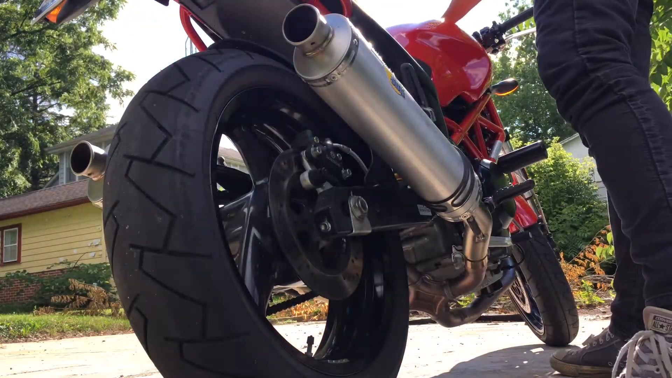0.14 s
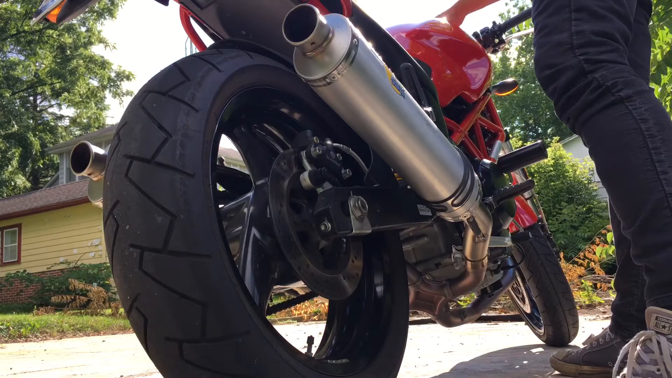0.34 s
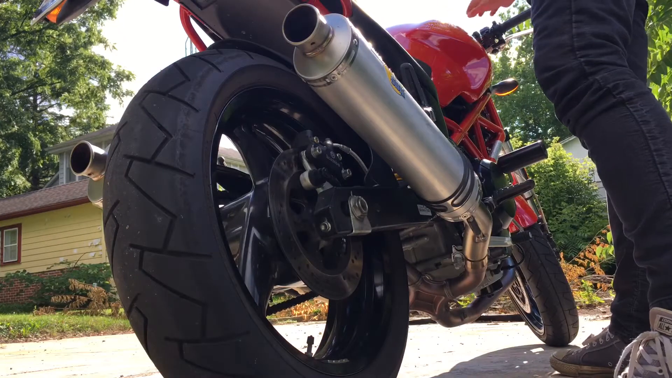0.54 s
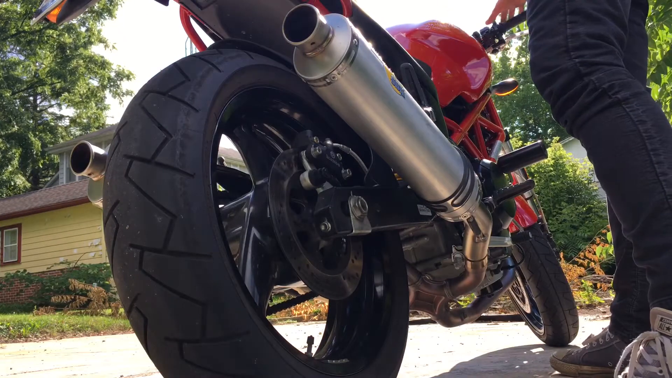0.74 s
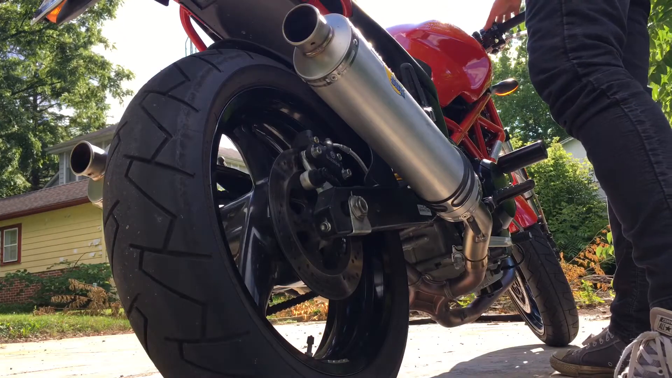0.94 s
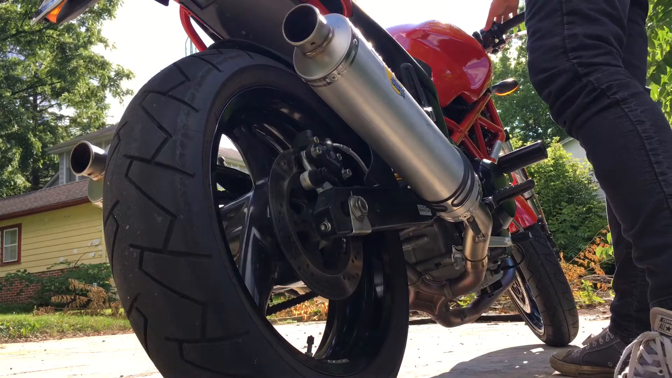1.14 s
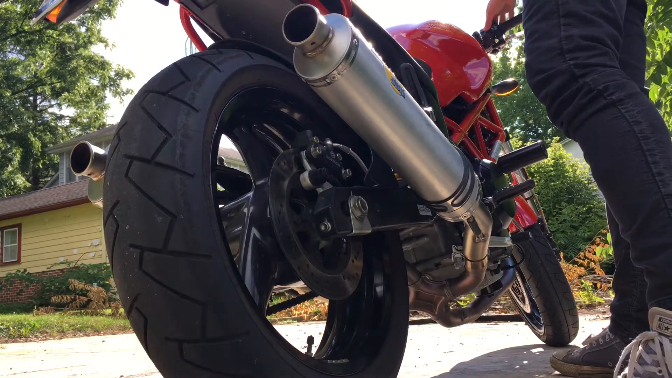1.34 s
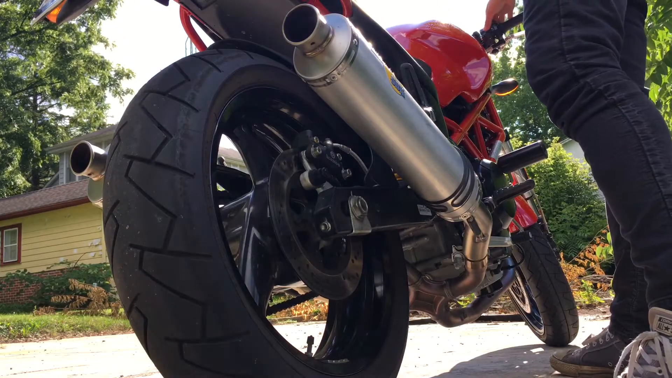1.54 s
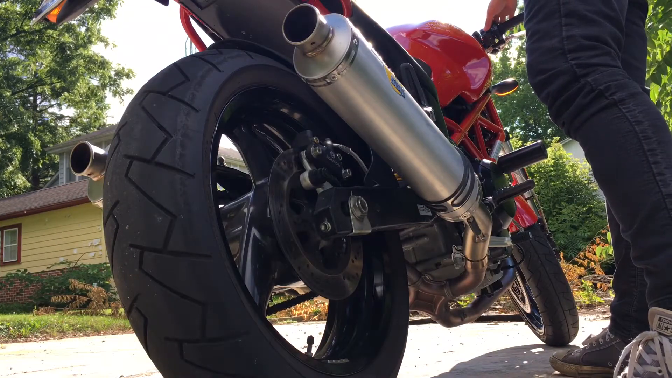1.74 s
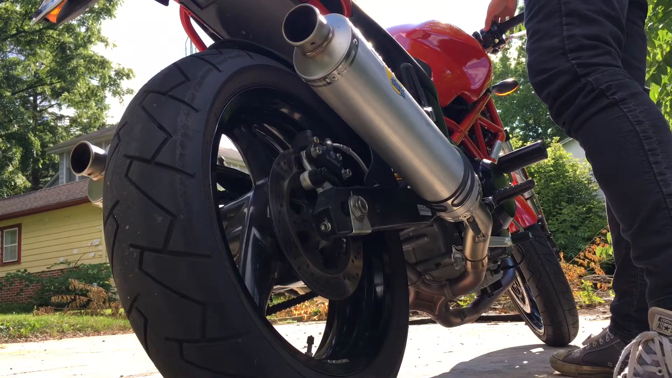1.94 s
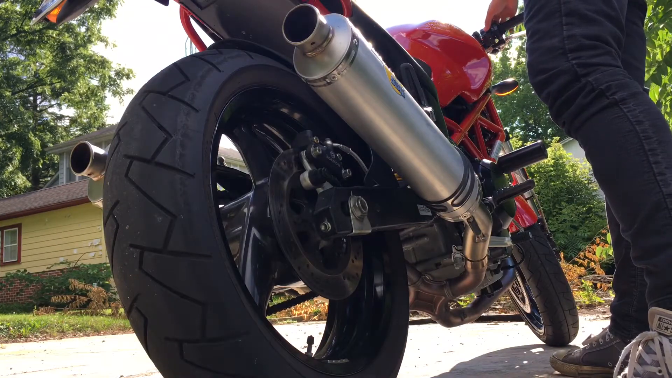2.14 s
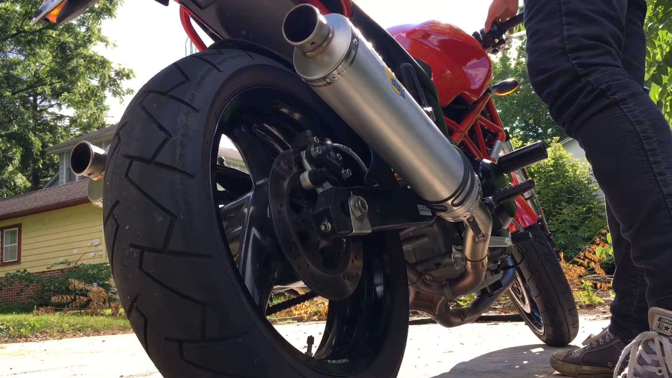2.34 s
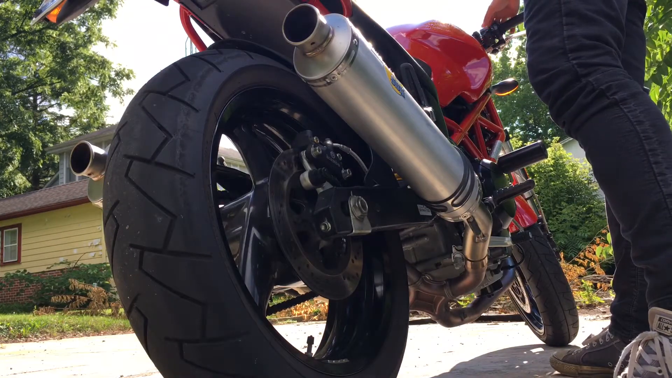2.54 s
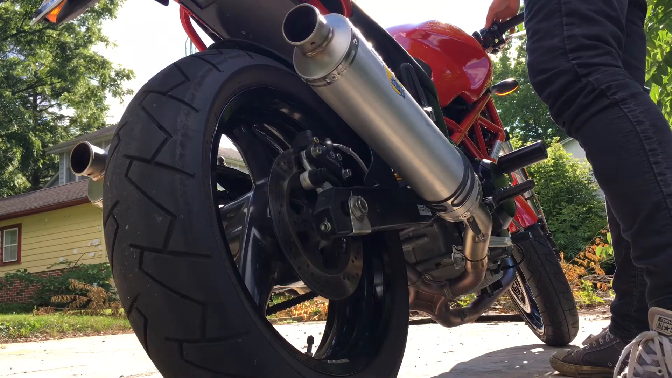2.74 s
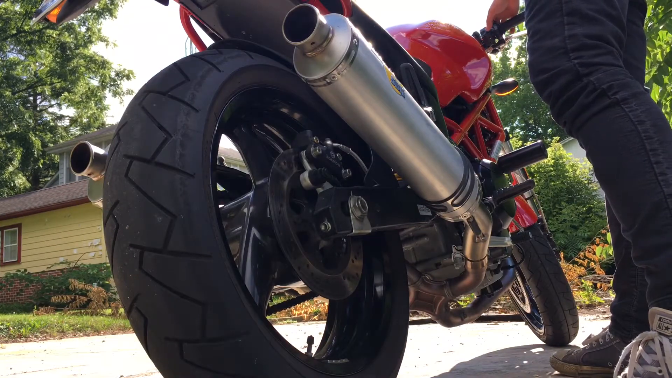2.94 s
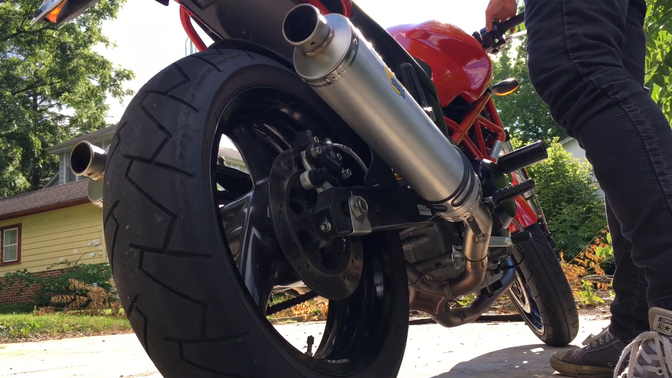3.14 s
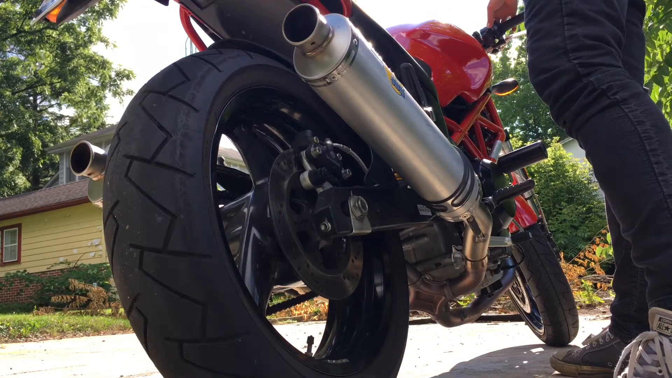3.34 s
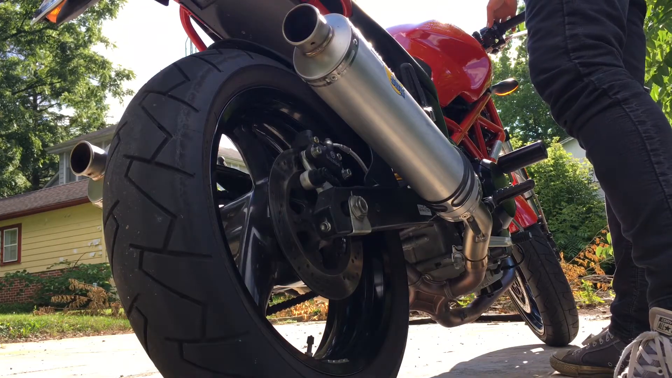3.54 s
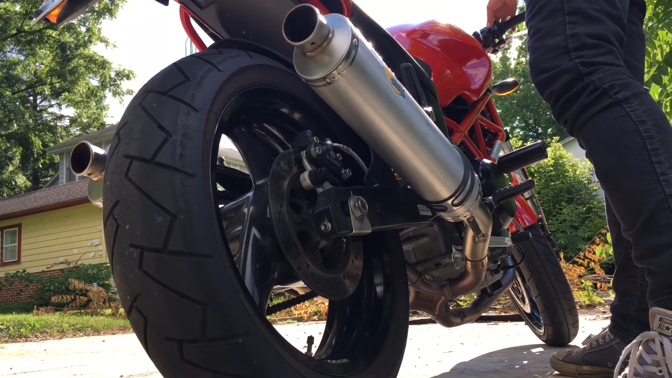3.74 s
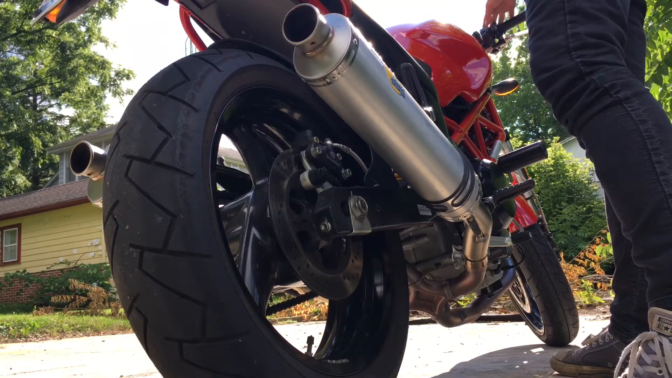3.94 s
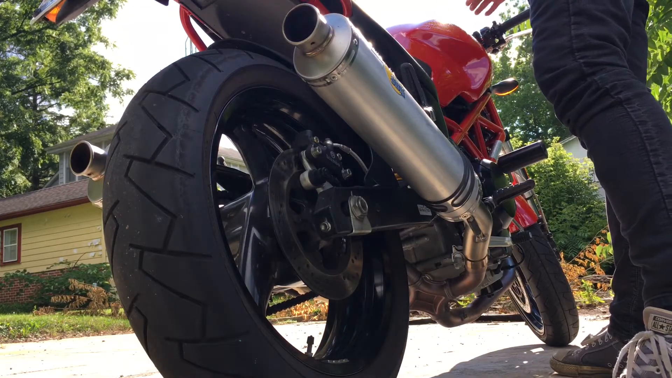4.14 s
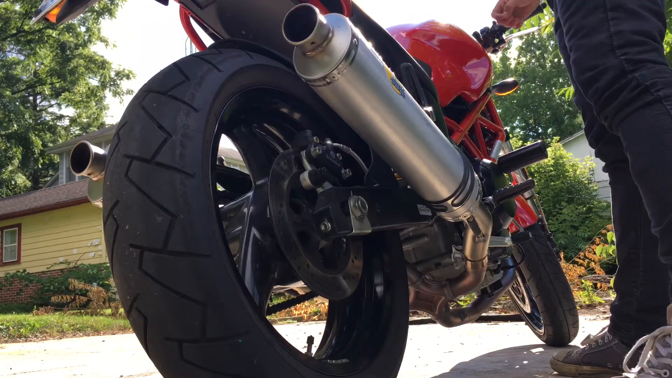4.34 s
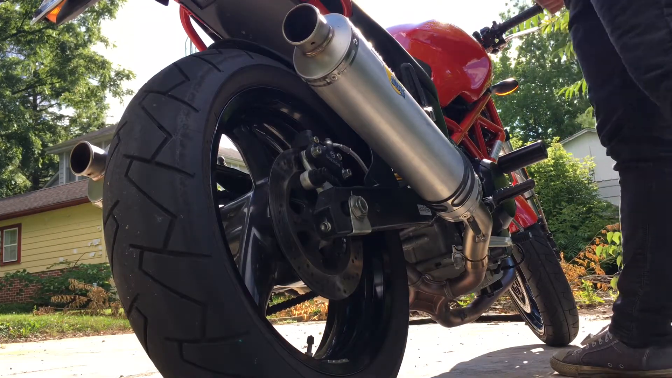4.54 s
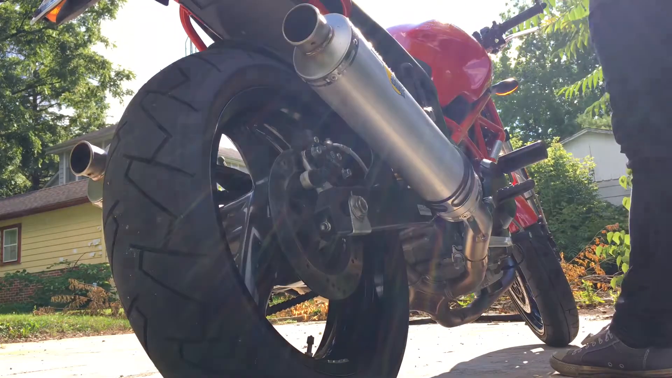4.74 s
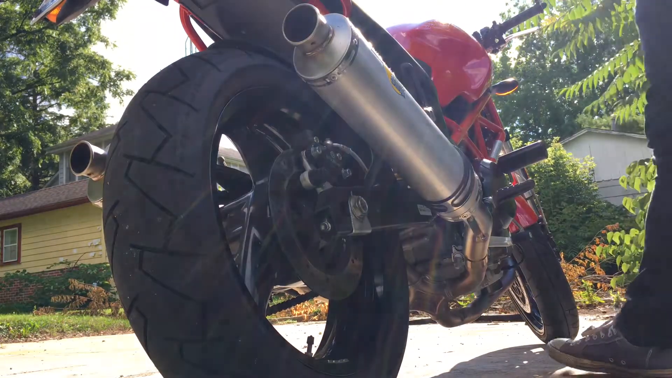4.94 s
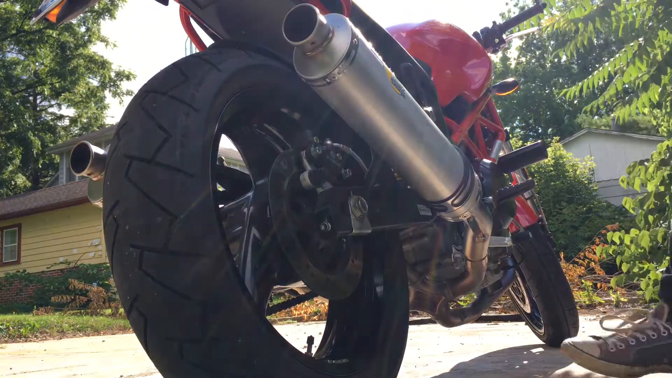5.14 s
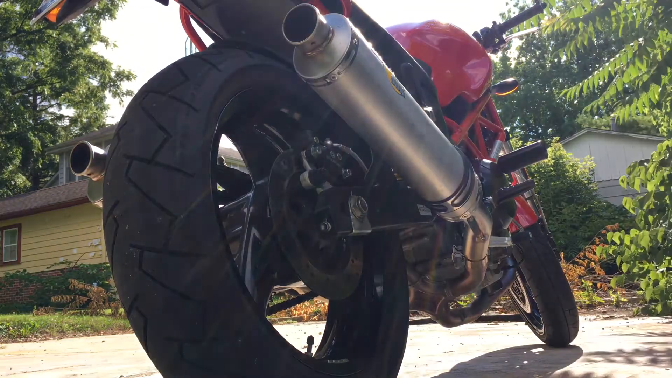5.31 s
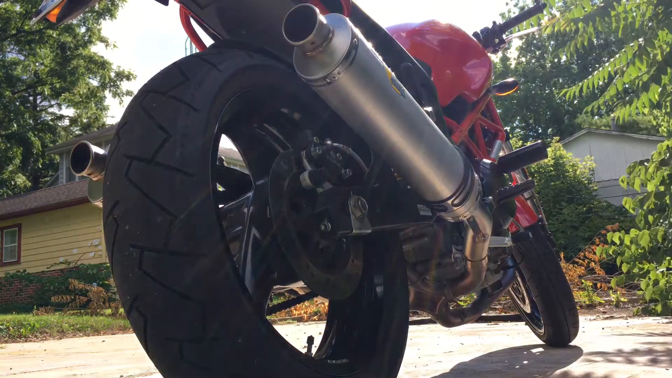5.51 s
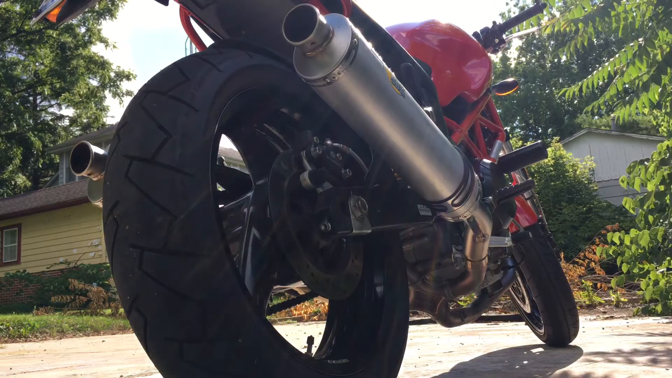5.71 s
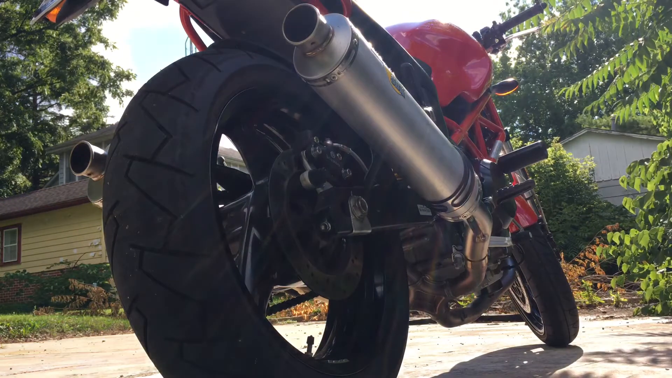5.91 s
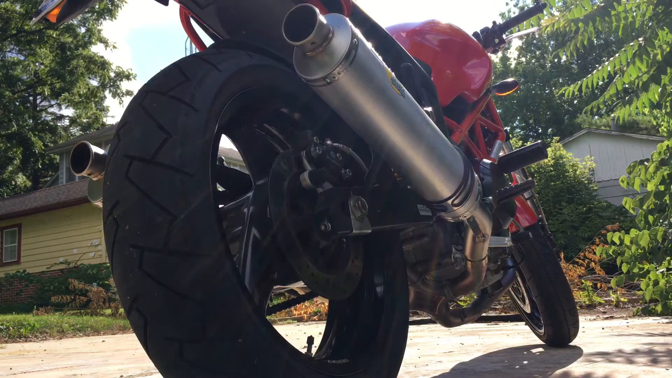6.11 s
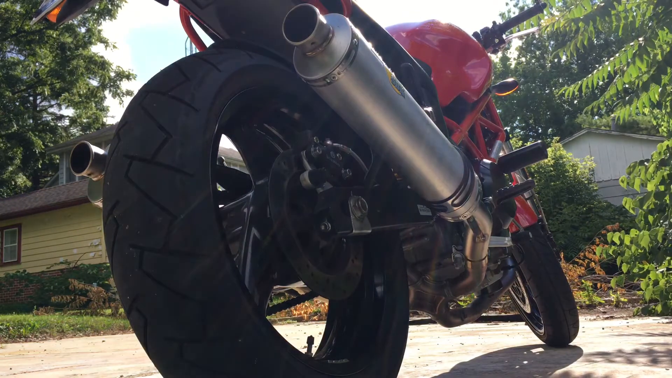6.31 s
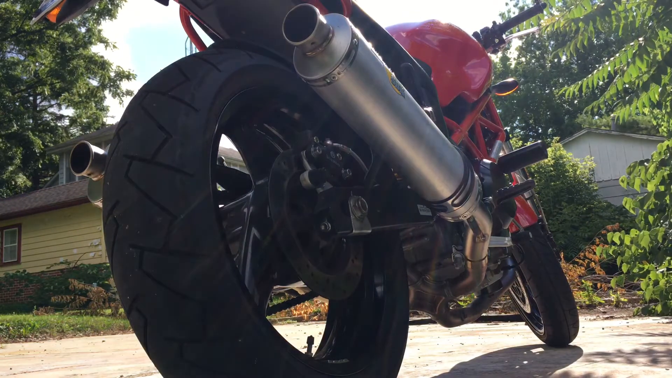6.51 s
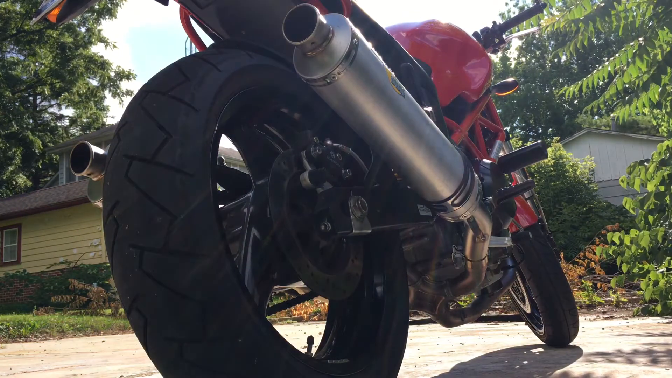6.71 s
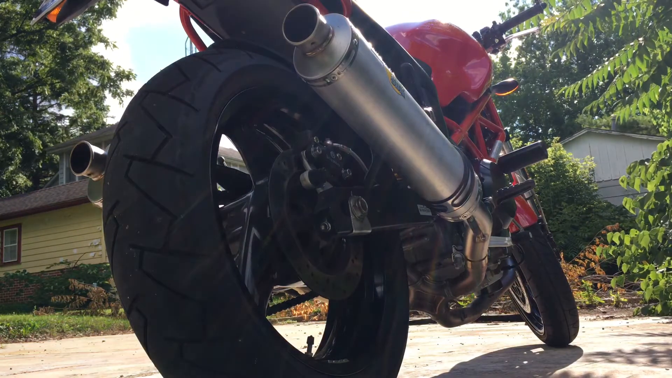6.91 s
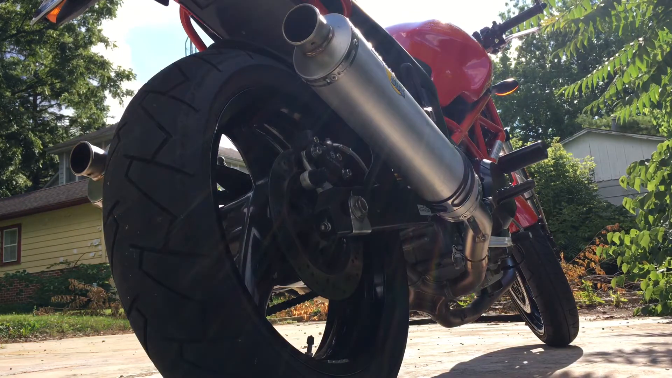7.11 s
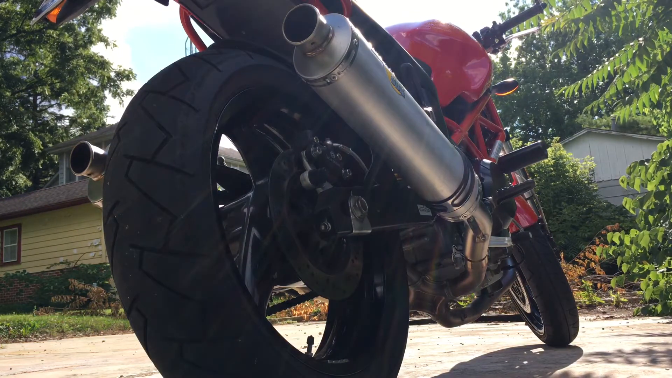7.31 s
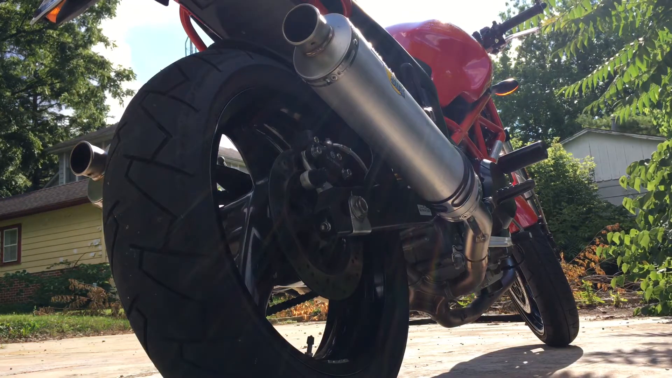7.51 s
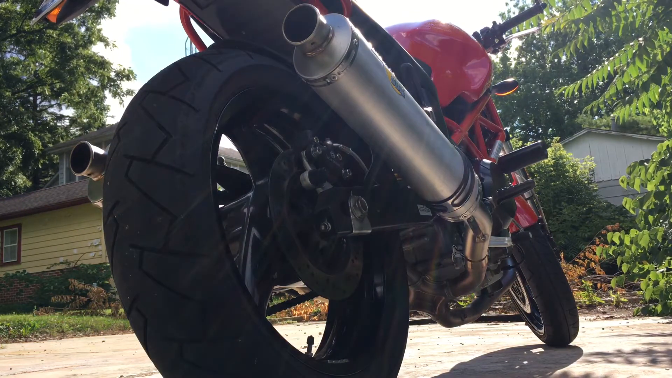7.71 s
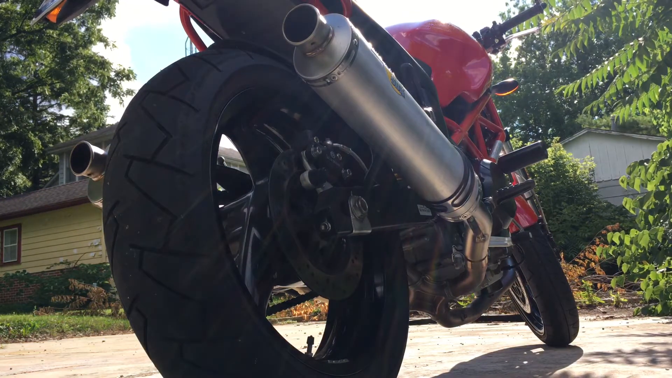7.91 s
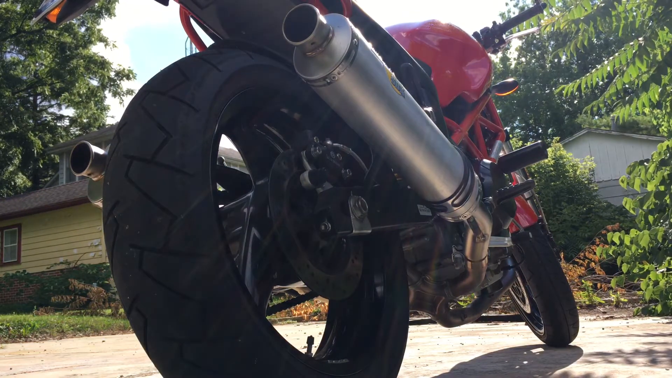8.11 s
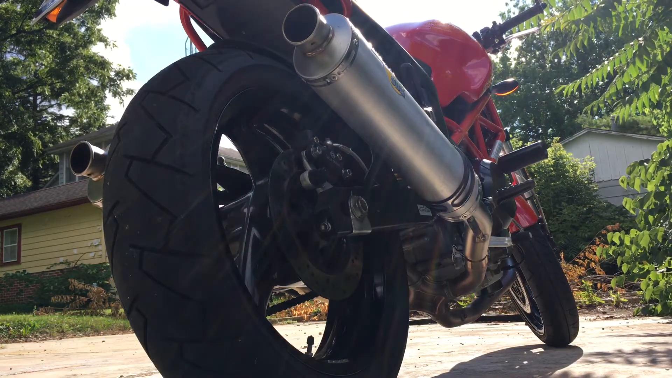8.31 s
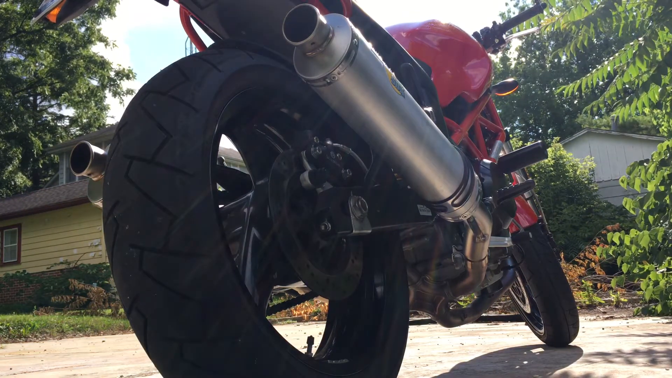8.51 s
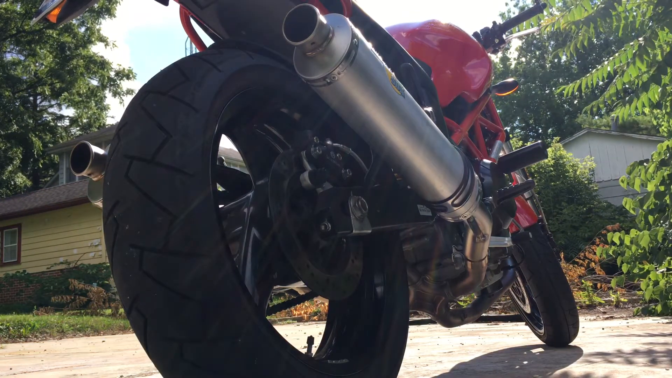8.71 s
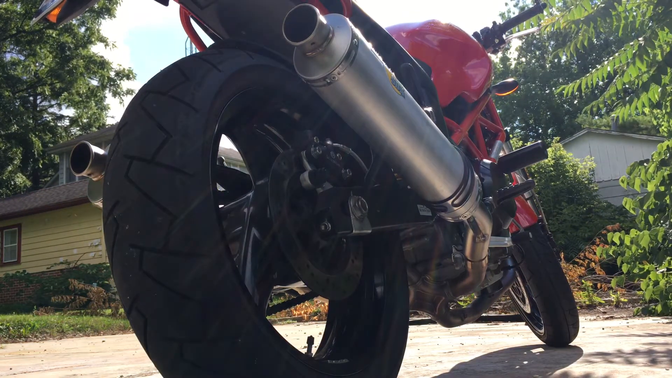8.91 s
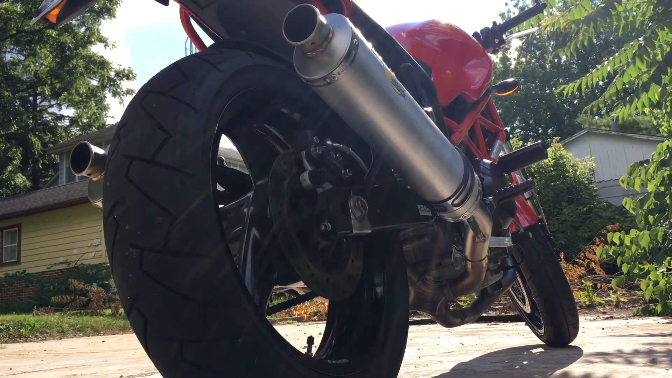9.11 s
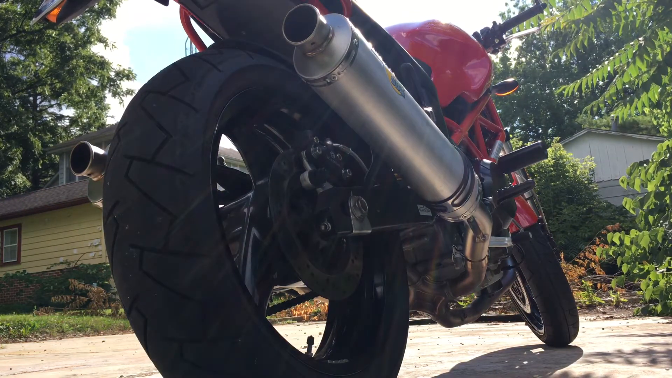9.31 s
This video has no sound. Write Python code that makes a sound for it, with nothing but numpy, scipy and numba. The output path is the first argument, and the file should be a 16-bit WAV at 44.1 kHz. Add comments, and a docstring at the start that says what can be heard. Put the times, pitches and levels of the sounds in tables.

```python
"""A driveway, at ground level behind the two open exhaust pipes of a V-twin motorcycle.
The fuel pump primes over a distant hum, the starter grinds and whines against compression, and the
first firings bark into a limiter. The engine settles into an uneven idle: slugs of gas ring the pipes,
jets hiss at the pipe mouths, valves tick and gears rattle the case."""
import sys
import numpy as np
from scipy import signal
from scipy.fft import rfft, irfft, next_fast_len
from scipy.io import wavfile
from scipy.ndimage import uniform_filter1d, minimum_filter1d
from numba import njit

SR = 44100
rng = np.random.default_rng(int(sys.argv[2]) if len(sys.argv) > 2 else 0)


def to_wav(s):
    """Save 16-bit WAV."""
    ch = np.atleast_2d(s).T  # columns
    pcm = np.round(np.clip(ch, -1, 1) * 32767)  # PCM
    wavfile.write(sys.argv[1], SR, pcm.astype(np.int16))


N = 412776
T = np.arange(N) / SR

# One double thump per engine cycle. Each row: start in seconds, near cylinder in dB,
# far cylinder in dB, hiss of the near blast in dB.
ENGINE_CYCLES = [(3.3004, -5, -25, -50), (3.4328, -2.2, -34, -53), (3.6059, 9, 3.5, -28),
                 (3.6969, 1, -12, -35.5), (3.7931, -8.5, -8.5, -46), (3.906, -13, -26, -55),
                 (4.035, 1.5, -1, -39.5), (4.1422, -0.5, -42, -42), (4.2496, -8.5, -23, -56),
                 (4.3668, 0, -7, -42.5), (4.476, -1.0, -11.5, -42.5), (4.585, -1.8, -12, -43.5),
                 (4.6949, -1, -21, -44), (4.804, -1.7, -10.3, -45), (4.918, -2, -7.5, -44.5),
                 (5.0307, -0.6, -10, -41.5), (5.139, -1.3, -12, -46), (5.2544, -0.5, -9, -43),
                 (5.3624, -0.5, -8, -44), (5.4718, -0.2, -16, -44), (5.5835, -0.2, -10.5, -43),
                 (5.6924, -1.5, -7, -44.5), (5.804, 0, -10, -42), (5.913, -1, -6, -44.5),
                 (6.0255, 0, -11.5, -40), (6.1354, -1, -11, -43), (6.2455, -0.5, -28, -43.5),
                 (6.355, -2.3, -8, -45), (6.466, 0.5, -19, -42.5), (6.5724, -1, -9, -44),
                 (6.6799, -0.5, -29, -43.5), (6.792, -3, -9, -46), (6.9047, 0, -9.5, -42),
                 (7.0097, -2, -5.5, -49), (7.1217, 0, -10.5, -42.5), (7.2296, -1.9, -12.5, -46.5),
                 (7.3461, 0.5, -9.5, -40.5), (7.458, -0.5, -9, -44.5), (7.5718, 0.3, -9.5, -41),
                 (7.681, -1.1, -17, -44.5), (7.7944, -0.9, -9, -42.5), (7.9088, -0.5, -11, -43),
                 (8.0173, -8, -8, -56), (8.1359, 0.5, -5, -41), (8.242, -3.5, -9, -49.5),
                 (8.3536, 0.3, -6, -41), (8.4582, -5.5, -9.5, -50), (8.57, 1, -7, -42.5),
                 (8.6747, -0.8, -8, -45.5), (8.7844, 0, -13, -42.5), (8.893, -4.5, -11.5, -52),
                 (9.0102, 0.5, -9.3, -40.5), (9.1191, -4.5, -5.5, -51), (9.2359, 0, -20, -41.5),
                 (9.344, -5, -30, -51)]


def undb(db):
    """Gain of a level in dB."""
    return 10 ** (np.asarray(db) / 20)


def curve_db(table, column=1):
    """One level column over time, silent before the first row."""
    rows = np.array(table)
    return np.interp(T, rows[:, 0], rows[:, column], left=-120)


def band(f, hz, width_hz):
    """Response of one resonance, gain 1 at its centre."""
    s = 1j * f / hz
    return s * width_hz / hz / (s * s + s * width_hz / hz + 1)


def noise(outline=None, modes=(), outline_db=0.):
    """Noise of rms 1, coloured by a (Hz, dB) outline and (Hz, width Hz, dB) resonances."""
    size = next_fast_len(N)
    f = np.arange(1, size // 2 + 2) * SR / size
    power = np.zeros(len(f))
    if outline:
        hz, db = np.transpose(outline)
        power += undb(2 * (np.interp(np.log(f), np.log(hz), db, left=-99, right=-99) + outline_db))
    for hz, width_hz, db in modes:
        power += undb(2 * db) / (1 + ((f - hz * hz / f) / width_hz) ** 2) ** 2
    y = irfft(rfft(rng.standard_normal(size)) * np.sqrt(power), size)[:N]
    return y / y.std()


def walk(rate_hz):
    """Slewed random steps, spread near 1."""
    hold = int(SR / rate_hz)
    steps = np.repeat(rng.standard_normal(N // hold + 1), hold)
    return 1.27 * uniform_filter1d(steps, hold)[:N]


def add(out, start_s, piece):
    """Mixes a piece into out."""
    i = int(start_s * SR)
    out[i:i + len(piece)] += piece[:max(N - i, 0)]


def bursts(starts, swells, scatter_db):
    """Gate of (delay ms, half-height length ms, dB) swells after each (s, dB) start."""
    gate = np.zeros(N)
    for s, db in starts:
        for delay_ms, length_ms, swell_db in swells:
            gain = undb(db + swell_db + scatter_db * rng.standard_normal())
            hump = np.hanning(int(2 * length_ms * SR / 1000) + 3)
            add(gate, s + (delay_ms - length_ms) / 1000, gain * hump)
    return gate


def glides(rows):
    """Short sliding tones with a flickering level."""
    out = np.zeros(N)
    for s, length_s, from_hz, to_hz, db in rows:
        hz = np.linspace(from_hz, to_hz, int(length_s * SR))
        tone = np.sin(2 * np.pi * np.cumsum(hz) / SR)
        add(out, s, undb(db) * np.hanning(len(hz)) ** .5 * tone)
    return out * undb(2.5 * walk(50))


def firings():
    """Every firing as (s, dB, pipe, pitch ratio); pipe 0 is near, 1 is far."""
    s, near_db, far_db, _ = np.transpose(ENGINE_CYCLES)
    cold_drop, warm_up_s = 0.22, 0.33  # cold gas carries sound slower and rings lower
    tune = 1 - cold_drop * np.exp((s[0] - s) / warm_up_s)
    lag_ms = 38.6 + 0.16 * np.clip(near_db, -10, 3)
    near = zip(s, near_db, [0] * len(s), tune)
    far = zip(s + lag_ms / 1000, far_db, [1] * len(s), tune)
    return [*near, *far]


def exhaust():
    """Each slug of gas rings its pipe behind a steep front; house walls return the upper part."""
    # Each row: frequency in Hz, width in Hz, signed share in the near pipe, same in the far pipe.
    pipe_modes = [(61.3, 6.9, 0.707, 0.552), (112.4, 27.5, 0.711, 0.154), (114.7, 14.5, 0.448, 1.465),
                  (137.3, 56.3, -2.17, -1.918), (138.4, 20.8, 1.498, 0.249), (166.2, 143.7, 1.115, 1.155),
                  (228.8, 120.4, -0.818, -0.694)]
    # Each row: delay in ms, level in dB.
    wall_echoes = [(30.5, -27), (64, -27)]
    size, ring_samples, front_delay_s = 32768, 10000, 0.00245
    f = np.fft.rfftfreq(size, 1 / SR)
    push = band(f, hz=80.7, width_hz=32.4) ** 2
    rings = [irfft(push * sum(mode[2 + pipe] * band(f, *mode[:2]) for mode in pipe_modes))
             for pipe in (0, 1)]
    near_peak = rings[0].max()
    front = irfft(band(f, hz=250.5, width_hz=185) ** 3)[:2000]
    front /= np.abs(front).max()
    out = np.zeros(N)
    for s, db, pipe, tune in firings():
        ring = np.interp(np.arange(ring_samples) * tune, np.arange(size), rings[pipe])
        add(out, s, undb(db) * ring / near_peak)
        front_db = -32.5 + 2 * db + 9.5 * pipe  # steepening grows faster than the pressure
        add(out, s + front_delay_s, undb(front_db) * front)
    wall_response = irfft(band(f, hz=283, width_hz=97) ** 2)[:4096]
    reflected = signal.fftconvolve(out, wall_response)[:N]
    for delay_ms, db in wall_echoes:
        add(out, delay_ms / 1000, undb(db) * reflected)
    return out


def pipe_rumble():
    """Eddies keep the lowest pipe resonances sounding between firings."""
    # Each row: time in seconds, level in dB.
    levels = [(3.25, -39), (3.35, -33), (3.6, -57), (3.65, -34), (3.95, -24.5), (4.3, -26.5), (7.5, -25),
              (9.36, -24)]
    # Each row: frequency in Hz, width in Hz, level in dB.
    low_modes = [(62.4, 32, 5.5), (116.6, 44, 5), (172, 32, -6)]
    return undb(curve_db(levels) + 2.7 * walk(25)) * noise(modes=low_modes)


def whoops():
    """A soft rising whoop follows every firing, louder after a stronger one."""
    delay_s, length_s, from_hz, to_hz = 0.027, 0.034, 170, 320
    rows = []
    for s, db, pipe, _ in firings():
        whoop_db = -35 + 4 * pipe + 0.77 * db + 1.5 * rng.standard_normal()
        rows.append((s + delay_s, length_s, from_hz, to_hz, whoop_db))
    return glides(rows)


def gas_jets():
    """Turbulent hiss at both pipe mouths, one puff per swing of the gas column."""
    # Each row: delay in ms, length in ms, level in dB.
    puffs = [(0, 4.4, 2), (6, 4.66, 1), (12, 6, -5)]
    # Each row: frequency in Hz, density in dB.
    spectrum = [(5000, -1.5), (8000, -5.5), (9600, 1), (12000, 4), (15000, 1), (16500, -14)]
    near = [(s, hiss_db) for s, _, _, hiss_db in ENGINE_CYCLES]
    far = [(s, -39.5 + 2.5 * min(db, 5)) for s, db, pipe, _ in firings() if pipe]
    return bursts(near + far, puffs, scatter_db=2.6) * noise(spectrum)


def shield_snap():
    """The near pipe's pressure wave snaps a loose shield, harder for a fierce blast."""
    # Each row: delay in ms, length in ms, level in dB.
    ticks = [(6.4, 1.6, -0.5), (8.5, 2.2, -9.5), (11.5, 4.4, -14.5)]
    # Each row: frequency in Hz, density in dB.
    spectrum = [(1200, -12), (1800, -5.5), (2800, 3.5), (3600, -8.5), (5000, -12.5), (8000, -13)]
    idle_snap_db, idle_hiss_db, full_rattle_db = -32, -43.5, -23
    starts = [(s, min(idle_snap_db + 1.8 * (hiss_db - idle_hiss_db), full_rattle_db))
              for s, _, _, hiss_db in ENGINE_CYCLES]
    return bursts(starts, ticks, scatter_db=2.2) * noise(spectrum)


def case_clatter():
    """Gears rattle each case panel in its own fits; valves and pistons knock at set crank angles."""
    # Each row: frequency in Hz, width in Hz, level in dB.
    panel_modes = [(632, 162, -1), (1180, 670, -4), (1855, 385, -3), (2754, 97, 1), (3320, 380, -3.5),
                   (4145, 590, -11.5), (6540, 300, -19)]
    # Each row: frequency in Hz, density in dB.
    bed_spectrum = [(150, -46), (250, 0.5), (463, -19.5), (620, -7), (858, -23.5), (1130, -9.5),
                    (1860, -23.5), (2360, -17.5), (3270, -10.5), (4760, -24), (6590, -17.5), (7820, -30),
                    (11400, -36), (15000, -36)]
    # Loudest as the engine catches. Each row: time in seconds, level in dB.
    levels = [(3.58, -57), (3.62, -24.5), (3.72, -37), (3.8, -42.5), (9.36, -42.5)]
    # Each row: position as a share of the cycle, frequency in Hz, width in Hz, length in ms, level in dB.
    knocks = [(0.247, 680, 260, 12.5, -46), (0.239, 1400, 2400, 11.3, -43), (0.95, 2120, 700, 1.4, -48),
              (0.36, 10400, 13000, 7, -52.5), (0.72, 8600, 12000, 6.3, -52.5)]
    panels = np.zeros(N)
    for hz, width_hz, db in panel_modes:
        panel_db = db + 10 * np.log10(width_hz / 1000) + 2.47 * walk(90)
        panels += undb(panel_db) * noise(modes=[(hz, width_hz, 0)])
    envelope = undb(curve_db(levels) + 1.4 * walk(300))
    out = envelope * (undb(-2) * panels + undb(-5) * noise(bed_spectrum))
    starts_s = np.array(ENGINE_CYCLES)[2:, 0]
    periods_s = np.minimum(np.diff(starts_s, append=99), 0.112)
    for share, hz, width_hz, length_ms, db in knocks:
        hits = [(s, db) for s in starts_s + share * periods_s]
        gate = bursts(hits, [(0, length_ms, 0)], scatter_db=0.5)
        out += gate * noise(modes=[(hz, width_hz, 0)])
    return out


def starter_gears():
    """Teeth grind, ring briefly and squeal as a piston climbs to compression; the brushes hiss."""
    # Each row: time in seconds, grind in dB, brush hiss in dB.
    levels = [(3.126, -28.5, -51), (3.25, -31.5, -45), (3.32, -35, -46), (3.4, -34, -44.5),
              (3.53, -37.5, -45.5), (3.6, -27.5, -40.5), (3.72, -59, -49), (3.78, -52, -55.5),
              (4.4, -54.5, -58.5)]
    # Each row: start in seconds, length in seconds, grind in dB, squeal in dB.
    compressions = [(3.152, 0.086, -33.5, -34.5), (3.333, 0.04, -28.5, -28), (3.541, 0.037, -27.5, -27.5)]
    # Each row of both: frequency in Hz, width in Hz, level in dB.
    gear_modes = [(646, 190, -6), (1080, 120, -5), (1356, 300, -7), (2757, 105, 1), (3195, 150, -3.5),
                  (3330, 29, -4), (5710, 430, -21)]
    squeal_modes = [(8500, 70, 2), (9000, 65, 5.5), (9200, 50, -4), (11300, 56, 4), (11300, 100, 3),
                    (11000, 96, 3)]
    # Each row: start in seconds, length in seconds, first and last pitch in Hz, level in dB.
    gear_rings = [(3.142, 0.067, 1280, 1470, -40), (3.18, 0.061, 3330, 3150, -32),
                  (3.367, 0.027, 2785, 2760, -28), (3.545, .04, 2800, 2710, -31.5)]
    end_s, release_s = levels[-1][0], 0.042
    release = np.clip((end_s - T) / release_s, 0, 1)
    grind, squeal = release * undb(curve_db(levels)), np.zeros(N)
    for s, length_s, grind_db, squeal_db in compressions:
        load = np.interp(T - s, [0, .003, length_s, length_s + .015], [0, 0.8, 0.46, 0.005])
        grind += undb(grind_db) * load
        squeal += undb(squeal_db) * load
    grind *= undb(2 * walk(200))
    grind *= noise([(150, 0.5), (1500, 1.5), (4600, -6), (5000, -17), (15000, -19)],
                   gear_modes, outline_db=-11.5)
    squeal *= undb(3.6 * walk(130))
    squeal *= noise([(7800, -4), (9000, 3.5), (12000, -7), (14000, -20)], squeal_modes, outline_db=-11)
    brushes = release * undb(curve_db(levels, column=2))
    brushes *= noise([(5000, -3), (8300, 4.5), (10000, -2), (13000, 1), (15500, -19)])
    return grind + squeal + brushes + glides(gear_rings)


def starter_motor():
    """The motor's whine sags under each compression and climbs again."""
    # Each row: time in seconds, pitch in Hz, level in dB.
    whine = [(3.14, 433.6, -55), (3.18, 423.7, -31), (3.23, 407.5, -32.5), (3.25, 542, -53),
             (3.3, 633, -39), (3.35, 562, -45), (3.385, 579, -41), (3.42, 643, -43), (3.465, 620, -50),
             (3.52, 660, -47), (3.56, 609, -49), (3.62, 645, -41), (3.66, 680, -70)]
    # Each row: multiple of the pitch, level in dB.
    partials = [(1, 0), (2.53, -0.5), (7, -9)]
    s, hz, db = np.transpose(whine)
    pitch_hz = np.interp(T, s, hz) * (1 + 0.0059 * walk(60))
    phase = 2 * np.pi * np.cumsum(pitch_hz) / SR
    tones = sum(undb(tone_db + 3 * walk(40)) * np.sin(k * phase) for k, tone_db in partials)
    return undb(np.interp(T, s, db, left=-120, right=-120)) * tones


def switch_clicks():
    """Switches and a relay give short broad cracks."""
    # Each row: start in seconds, peak in dB, centre in Hz, 60 dB decay time in seconds.
    clicks = [(.002, -28.5, 9000, 0.13), (.004, -33.5, 3600, 0.13), (.081, -36, 11000, .02),
              (0.3892, -43, 3000, 0.0022), (.3887, -27, 443, 0.0042), (.5467, -44, 9000, 0.17),
              (2.054, -38.5, 7000, 0.02), (2.4359, -47, 12000, .015), (3.128, -17, 10100, .03),
              (3.131, -36, 2930, 0.03), (3.544, -29, 2780, 0.036)]
    out, t = np.zeros(N), np.arange(8192) / SR
    f = np.fft.rfftfreq(len(t), 1 / SR)
    for s, db, hz, t60_s in clicks:
        burst = rng.standard_normal(len(t)) * 1000 ** (-t / t60_s)
        crack = irfft(rfft(burst) * band(f, hz, width_hz=0.93 * hz))
        add(out, s, undb(db) * crack / np.abs(crack).max())
    return out


def fuel_pump():
    """The pump primes for two seconds with a high hiss."""
    # Each row: time in seconds, level in dB.
    levels = [(.05, -62), (.12, -61), (.5, -61.5), (.9, -63), (2.04, -67.5), (2.07, -110)]
    # Each row: frequency in Hz, width in Hz, level in dB.
    hiss_modes = [(9640, 1200, 0), (11650, 1100, 6), (12600, 400, -3), (14200, 250, -4)]
    hiss = noise([(7000, 3), (12000, -18), (16500, -8)], hiss_modes, outline_db=-4.5)
    return undb(curve_db(levels) + 1.6 * walk(7.9)) * hiss


def whistles():
    """Two faint thin whistles before the start."""
    # Each row: start in seconds, length in seconds, first and last pitch in Hz, level in dB.
    slides = [(.12, .4, 11450, 12300, -66), (1.3, 0.27, 7550, 7300, -68)]
    return glides(slides)


def yard():
    """A far machine drones under a slowly fading hum; air and rustling leaves lie above."""
    # Each row: multiple of the machine's turning rate, level in dB.
    harmonics = [(3, -18), (4, -0.5), (5, 3), (7, -8), (9, -17), (10, -19), (13, -22), (17, -32)]
    # Each row of both: frequency in Hz, density in dB.
    hum_spectrum = [(15, -65), (25, -27), (48, -12), (58, -7), (82, -1), (210, -21.5), (243, -27),
                    (263, -65), (309, -47), (600, -40.5), (780, -57), (1320, -120)]
    air_spectrum = [(180, -9.5), (300, -10), (509, -20.5), (968, -16), (1140, -17.5), (1350, -19),
                    (2000, -25.5), (16500, -45)]
    # Each row: time in seconds, level in dB.
    leaf_levels = [(0., -58), (.1, -56.5), (2.1, -61), (2.5, -80), (3.1, -66)]
    turning_hz, width_hz, fade_db_per_s = 18.05, 1.97, -0.41
    drone = undb(-30.5) * noise(modes=[(k * turning_hz, width_hz, db) for k, db in harmonics])
    hum = undb(-33.5) * noise(hum_spectrum)
    air = undb(-53.5 + 0.13 * walk(4.6)) * noise(air_spectrum)
    leaves = undb(curve_db(leaf_levels) + 2.3 * walk(29.86))
    leaves *= noise([(1500, 13), (3000, 2), (10000, -5), (16500, -6)])
    return undb(fade_db_per_s * T) * (hum + drone) + air + leaves


def scene():
    """All sources in one channel."""
    engine = exhaust() + pipe_rumble() + whoops() + gas_jets() + shield_snap() + case_clatter()
    start_up = starter_gears() + starter_motor() + switch_clicks() + fuel_pump() + whistles()
    return (engine + start_up + yard())[None]


@njit
def recover(gain, step):
    """Limiter gain drops at once and climbs back gradually."""
    out, held = np.empty(len(gain)), 1.
    for i in range(len(gain)):
        held = min(gain[i], held + (1 - held) * step)
        out[i] = held
    return out


def record(dry):
    """A look-ahead limiter holds down the barks; a steep low-pass cuts the top."""
    ceiling, release_s, cutoff_hz = 0.995, 0.00067, 15850
    needed = np.minimum(1, ceiling / (np.abs(dry[0]) + 1e-9))
    ahead = minimum_filter1d(needed, size=131)
    gain = uniform_filter1d(recover(ahead, 1 / (release_s * SR)), size=65)
    low_pass = signal.ellip(10, .2, 70, cutoff_hz, fs=SR, output="sos")
    return signal.sosfilt(low_pass, dry * gain)


dry = scene()
out = record(dry)
to_wav(out)
```